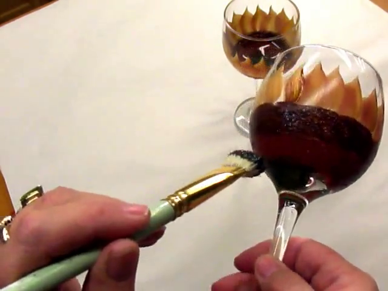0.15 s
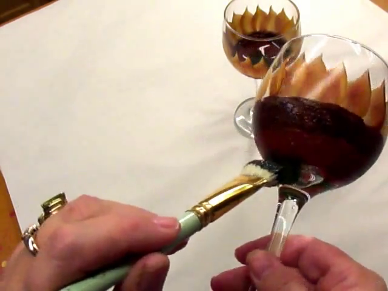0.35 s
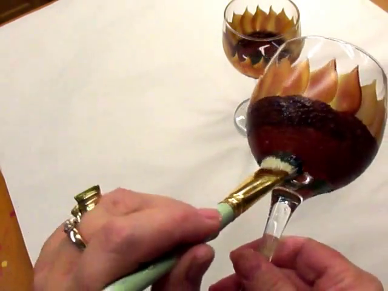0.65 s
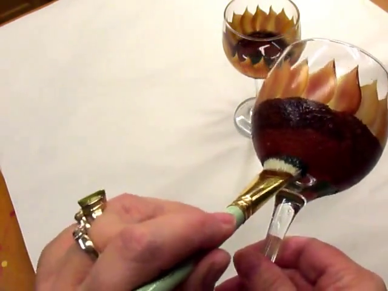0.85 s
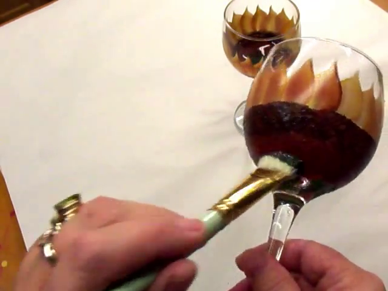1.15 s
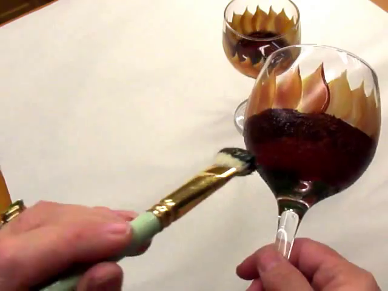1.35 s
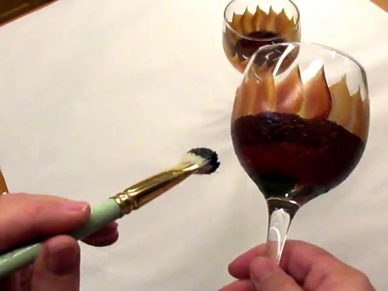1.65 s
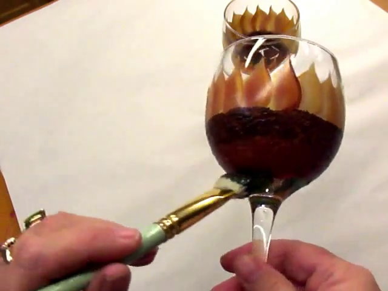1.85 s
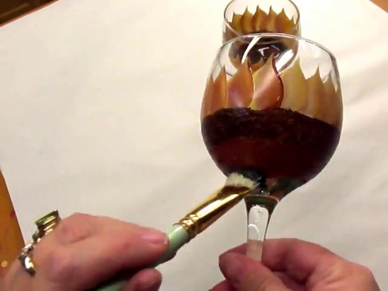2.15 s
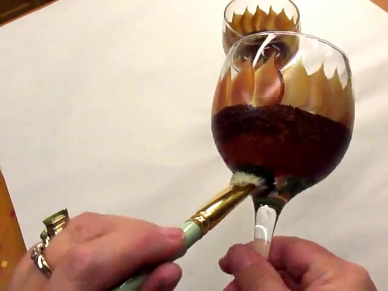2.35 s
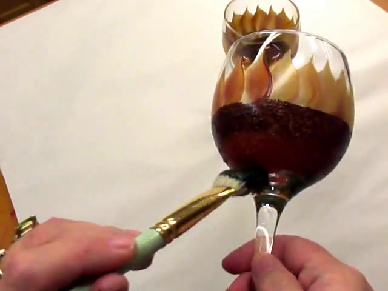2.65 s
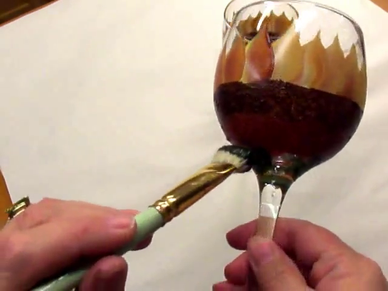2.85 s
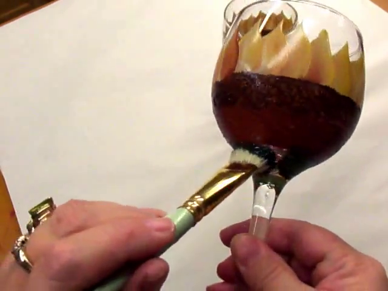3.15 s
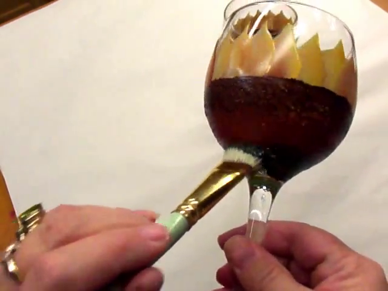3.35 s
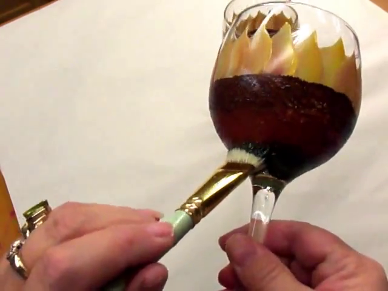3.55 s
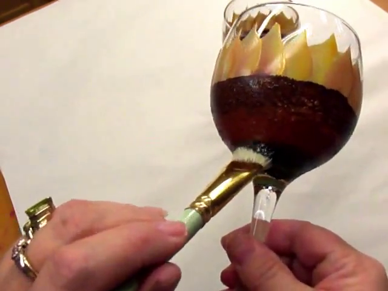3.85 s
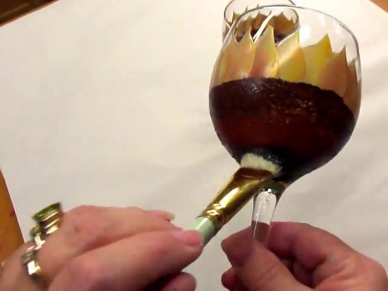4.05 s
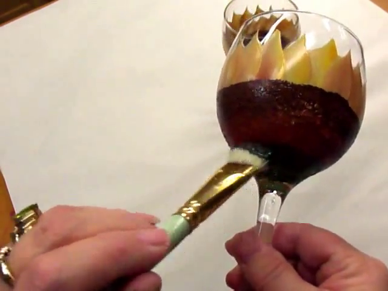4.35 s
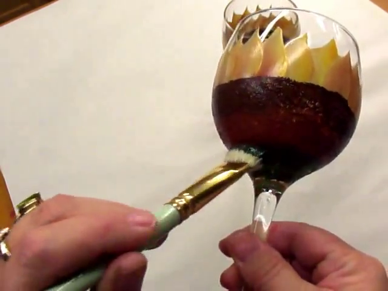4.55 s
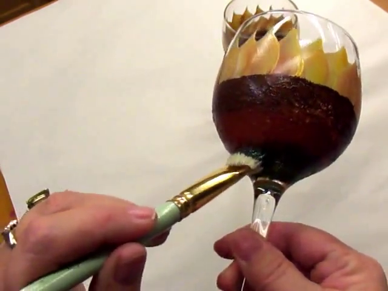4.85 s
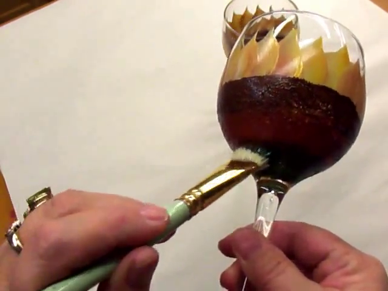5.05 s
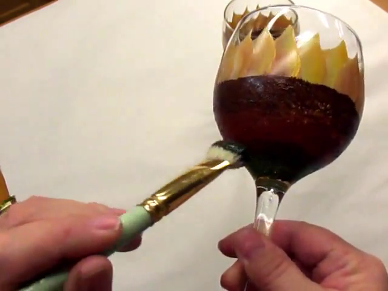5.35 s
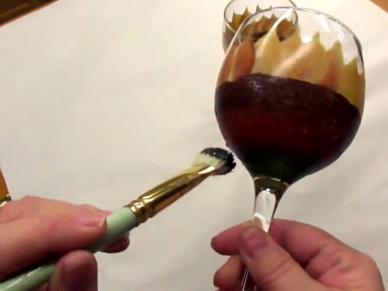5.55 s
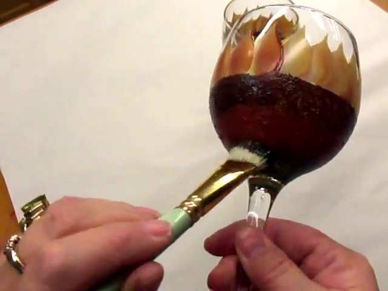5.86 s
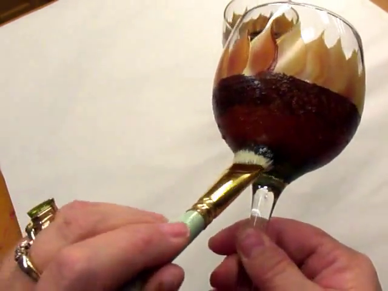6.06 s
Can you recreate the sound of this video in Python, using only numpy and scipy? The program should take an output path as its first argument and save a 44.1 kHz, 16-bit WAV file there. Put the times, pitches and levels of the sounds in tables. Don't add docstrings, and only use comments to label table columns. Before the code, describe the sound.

In a quiet humming room, tiny brush crackles are broken by a single loud table knock with a glassy ring, then grow busier and calm.

```python
import sys
import numpy as np
from scipy import signal
from scipy.fft import rfft, irfft
from scipy.io import wavfile
from scipy.ndimage import uniform_filter1d

SR = 44100
rng = np.random.default_rng(int(sys.argv[2]) if len(sys.argv) > 2 else 0)


def inscribe(sig):
    pcm = np.round(np.clip(np.atleast_2d(sig).T, -1, 1) * 32767)
    wavfile.write(sys.argv[1], SR, pcm.astype(np.int16))


def undo_db(level):
    steps = np.asarray(level, float) / 20
    return 10 ** steps


N = 273552
TIME_S = np.arange(N) / SR
KNOCK_S = 2.5174


def level(x, db):
    return x * undo_db(db) / np.sqrt(np.mean(x ** 2))


def band(x, low_hz, high_hz):
    sos = signal.butter(2, [low_hz, high_hz], "bandpass", fs=SR, output="sos")
    return signal.sosfilt(sos, x)


def walk(rate_hz):
    hold = int(SR / rate_hz)
    steps = np.repeat(rng.standard_normal(N // hold + 1), hold)
    smooth = uniform_filter1d(uniform_filter1d(steps, hold), hold)
    return 0.58 * smooth[:N]


def ring(t, pitch_hz, t60_s, rise_s):
    t = np.maximum(t, 0)
    build_up = 1 - np.exp(-t / rise_s)
    decay = np.exp(-np.log(1000) * t / t60_s)
    return build_up * decay * np.sin(2 * np.pi * pitch_hz * t)


def snaps(rows):
    low_cycles, high_cycles = 1.02, 1.3
    high_lag_s = 0.00009
    out = np.zeros(N + 256)
    for start_s, low_db, low_hz, high_db, high_hz in rows:
        i = int(start_s * SR) - 8
        t = (i + np.arange(256)) / SR - start_s + 0.00018
        low_t60_s = np.log(1000) * low_cycles / low_hz
        high_t60_s = np.log(1000) * high_cycles / high_hz
        low = ring(t, low_hz, low_t60_s, 0.25 / low_hz)
        high = ring(t - high_lag_s, high_hz, high_t60_s, 0.5 / high_hz)
        out[i:i + 256] += undo_db(low_db) * low_hz / 4000 * low
        out[i:i + 256] += undo_db(high_db) * high_hz / 4000 * high
    return undo_db(-0.4) * out[:N]


# start_s, low_db, low_hz, high_db
THREADS = [(0.7573, -25, 5270, -20), (0.782, -35, 4200, -35), (0.9258, -27.5, 2800, -40),
           (1.0601, -33, 3200, -32.5), (1.073, -34, 3200, -38), (1.1457, -26, 3000, -34),
           (1.1566, -24, 2800, -30), (1.1618, -26, 2380, -44), (1.1656, -31, 3400, -28),
           (2.3913, -46, 2000, -26.5), (3.1732, -33, 4000, -34), (3.264, -18.5, 5000, -28),
           (3.2784, -27.5, 3000, -32), (3.4464, -38, 3000, -33.5), (3.5356, -30, 2800, -30.5),
           (3.6142, -25, 3200, -32), (3.6235, -34, 3200, -39), (3.6884, -24, 2600, -27.5),
           (3.7042, -25.5, 3200, -30.5), (3.7116, -26.5, 5600, -32), (3.8827, -29.5, 2800, -41),
           (3.902, -31, 4600, -31), (3.9151, -34, 3400, -34), (4.0125, -31, 3800, -25.5),
           (4.0323, -24.5, 4500, -25), (4.305, -32, 5650, -24.5), (4.3631, -28, 5200, -29),
           (4.5494, -36, 3400, -36), (4.9708, -30, 5660, -31), (5.2582, -31, 2800, -33)]
# start_s, low_db, low_hz, high_db
BRISTLES = [(0.7592, -29, 2400, -41), (1.1474, -29, 3000, -34), (1.1533, -43, 3400, -33),
            (1.1601, -21.5, 3000, -34), (1.2718, -29, 3750, -44), (2.2376, -39, 4000, -30),
            (2.2389, -40, 3600, -33), (2.2397, -23.5, 3570, -22.5), (3.1594, -50, 3600, -35),
            (3.5295, -29, 4000, -34.5), (3.6317, -34, 3600, -38), (3.7982, -39, 5200, -28),
            (3.8075, -26.5, 3600, -28.5), (3.8182, -30, 3000, -34), (3.8582, -31, 4200, -43),
            (3.8657, -29.5, 2600, -42), (3.9454, -21.5, 2800, -25), (4.0411, -33, 4000, -42),
            (4.1832, -52, 3600, -31), (4.2127, -32.5, 3400, -22), (4.2882, -41, 3600, -36),
            (4.2923, -27, 4400, -23), (4.2967, -35, 3800, -30), (4.3035, -30, 4500, -26),
            (4.3308, -28, 4800, -34), (4.3424, -37, 3600, -33), (4.366, -40, 3600, -33),
            (4.6927, -26, 3000, -36), (4.6944, -33, 2800, -35), (6.1621, -31, 4600, -53)]


def dabs():
    thread_high_hz, bristle_high_hz = 5870, 8000
    threads = [(*row, thread_high_hz) for row in THREADS]
    bristles = [(*row, bristle_high_hz) for row in BRISTLES]
    rows = np.array(threads + bristles)
    start_s, low_db, low_hz, high_db, high_hz = rows.T
    out = snaps(rows)
    for kind in ("twin", "straggler", "straggler"):
        wait, size, low, high = rng.random((len(rows), 4)).T
        if kind == "twin":
            lag_ms = np.interp(wait, (0, 1), (0.25, 0.8))
            db = -9 - 5 * size
            low, high = 1, 1
        else:
            lag_ms = 1.5 - 6 * np.log(1 - wait)
            db = -17 + 4 * (2 * size - 1)
            low, high = 0.88 + 0.5 * low, 0.87 + 0.33 * high
        late_s = start_s + lag_ms / 1000
        out += snaps(np.transpose([late_s, low_db + db, low_hz * low, high_db + db, high_hz * high]))
    return out


# time_s, snaps_per_s
CRACKLE = [(0, 5), (.7, 8), (1.3, 8), (2.1, 5), (2.6, 8), (3.2, 15), (3.6, 25), (4.4, 25), (4.8, 15),
           (5.3, 10), (6.2, 8)]


def crackle():
    when, chance, size, low, high, tilt = rng.random((400, 6)).T
    start_s = 0.017 + when * (TIME_S[-1] - 0.02)
    snaps_per_s = np.interp(start_s, *np.transpose(CRACKLE))
    happens = chance < snaps_per_s * TIME_S[-1] / len(start_s)
    low_db = -48 + 10 * size
    high_db = low_db - 10.5 + 12 * tilt
    rows = np.transpose([start_s, low_db, 2500 + 2600 * low, high_db, 6000 + 3000 * high])
    return snaps(rows[happens])


# pitch_hz, level_db, t60_s
BOWL = [(2223, -35, 0.02), (2800, -35.5, 0.012), (3200, -43.5, 0.029), (4900, -35, 0.017),
        (8240, -41, 0.01)]


def bowl(x):
    t = np.arange(2048) / SR
    modes = sum(undo_db(db) * ring(t, hz, t60_s, 0.00013) for hz, db, t60_s in BOWL)
    late = np.roll(x, int(1.364 * SR / 1000))
    echo = undo_db(-21) * band(late, 1000, 7100)
    return x + echo + signal.fftconvolve(x, modes)[:N]


# start_s, level_db, push_ms
BLOWS = [
    (2.5174, -1.5, 0.13),
    (2.5189, -0.5, 0.27),
    (2.522, -19, 0.13),
    (2.5257, -16, 0.13),
]
# pitch_hz, level_db, t60_s
STRIKER = [(956, -23, 0.067), (1215, -16, 0.027), (1530, -10.5, 0.022), (1820, -23, 0.012),
           (2240, -17, 0.02), (3250, -15, 0.014), (3800, -19.5, 0.027), (6660, -17.5, 0.031)]
# pitch_hz, level_db, t60_s, rise_ms
RINGING = [(69, -51, 0.38, 20), (102, -44, 0.23, 13), (143.5, -34, 0.16, 4.9), (205, -22, 0.21, 6),
           (255, -32, .05, 4), (422, -28, 0.041, 4), (572, -30, 0.06, 1.9), (842, -32.5, 0.07, 2.8),
           (969, -20, 0.06, 1.5), (1218, -23, 0.082, 2), (1325, -32, 0.14, 8.8), (1434, -31, .14, 8),
           (1836, -27, 0.075, 1), (2150, -31, 0.15, 2), (2225, -26, 0.09, 1), (2440, -25, 0.056, 1),
         (2530, -43, .06, 1), (2895, -25, 0.12, 0.72), (3400, -33, 0.066, 1), (3680, -41, 0.15, 2),
         (4000, -43, 0.076, 1), (6960, -37.5, 0.16, 0.85)]


def knock():
    t = np.arange(SR) / SR
    striker = 0
    for k, (hz, db, t60_s) in enumerate(STRIKER):
        striker = striker + (-1) ** k * undo_db(db) * ring(t, hz, t60_s, 0.0001)
    force = np.zeros(N)
    for start_s, db, push_ms in BLOWS:
        push = np.exp(-0.5 * ((TIME_S - start_s) / (push_ms / 4000)) ** 2)
        force += undo_db(db) * push / (push_ms * SR / 1600)
    out = signal.fftconvolve(force, striker)[:N]
    start = int(KNOCK_S * SR)
    since_s = TIME_S[start:start + SR] - KNOCK_S
    for hz, db, t60_s, rise_ms in RINGING:
        out[start:start + SR] += undo_db(db) * ring(since_s, hz, t60_s, rise_ms / 1000)
    return out


# low_hz, high_hz, crack_db, crack_t60_s, tail_db, tail_t60_s
CLATTER = [(236, 830, -30.5, 0.073, -39.5, 0.16), (794, 1930, -27, 0.044, -36, 0.19),
           (2000, 4040, -30.5, 0.061, -36.5, 0.24), (4200, 6400, -38, 0.078, -41.5, 0.21),
           (6300, 9700, -34, 0.039, -41, 0.24), (8500, 13500, -39, 0.026, -52, 0.23)]


def clatter():
    t = np.maximum(TIME_S - KNOCK_S, 0)
    onset = np.minimum(t / 0.00043, 1)
    out = 0
    for low_hz, high_hz, crack_db, crack_t60_s, tail_db, tail_t60_s in CLATTER:
        crack = undo_db(crack_db - 60 * t / crack_t60_s)
        tail = undo_db(tail_db - 60 * t / tail_t60_s)
        grain = undo_db(4.4 * walk(250))
        noise = level(band(rng.standard_normal(N), low_hz, high_hz), 0)
        out = out + noise * grain * (crack + tail) * onset
    return out


# start_s, low_db, low_hz, high_db, high_hz
RATTLE = [
    (2.5665, -38, 4500, -33, 8800),
    (2.5818, -39, 5000, -40, 9000),
    (2.5885, -38, 3500, -40, 8500),
    (2.5915, -38, 5200, -32, 9000),
    (2.6003, -42, 4800, -39, 9200),
    (2.6025, -31, 4800, -40, 8000),
    (2.6113, -46, 4000, -42, 7500),
    (2.6387, -40, 4500, -52, 7000),
]


def rattle():
    return snaps(RATTLE)


# pitch_hz, level_db, t60_s, rise_ms
SING = [(1119, -48, 1.3, 250), (2319, -39, .88, 70)]


def sing():
    t = TIME_S - KNOCK_S
    return sum(undo_db(db) * ring(t, hz, t60_s, rise_ms / 1000) for hz, db, t60_s, rise_ms in SING)


# low_hz, high_hz, t60_s, level_db
ROOM = [(297, 710, 0.23, -12), (706, 1930, 0.17, -13.5), (2000, 4200, 0.18, -12), (5000, 21000, 0.097, -9)]


def room(x):
    first_echo_ms = 5.4
    t = np.arange(SR // 2) / SR - first_echo_ms / 1000
    patches = undo_db(3 * rng.standard_normal(len(t) // 16 + 1)).repeat(16)[:len(t)]
    grit = rng.standard_normal(len(t)) * patches * (t > 0)
    tail = 0
    for low_hz, high_hz, t60_s, db in ROOM:
        fading = grit * np.exp(-np.log(1000) * t / t60_s)
        tail = tail + undo_db(db - 23.5) * band(fading, low_hz, high_hz)
    return signal.fftconvolve(x, tail)[:N]


# pitch_hz, level_db
HUM = [(240, -85), (360.3, -73.5), (479.9, -72.5), (600, -67), (720, -100)]
# pitch_hz, width_hz, level_db
BUZZ = [(3760, 213, -79), (5420, 310, -86), (2900, 970, -82), (4570, 800, -84.5)]
# time_s, gain_db
BUZZ_GAIN = [(0, -16), (1.1, -17), (1.3, 9), (3, 12), (4.5, 11), (6.2, 13)]


def hum_and_buzz():
    hum = 0
    for hz, db in HUM:
        tone = np.sqrt(2) * np.sin(2 * np.pi * (hz * TIME_S + rng.random()))
        hum = hum + undo_db(db + 2 * walk(2.8)) * tone
    cycles = np.floor(TIME_S * 59.94 - 0.16)
    pulses = np.diff(cycles, prepend=-1)
    pulses = pulses * undo_db(2.2 * rng.standard_normal(N)) * rng.choice([-1, 1], N)
    buzz = sum(level(band(pulses, hz - width / 2, hz + width / 2), db) for hz, width, db in BUZZ)
    return hum + buzz * undo_db(np.interp(TIME_S, *np.transpose(BUZZ_GAIN)))


# pitch_hz, level_db (per Hz)
AIR = [(15, -56), (25, -28), (220, -5), (291, -6.5), (340, -4.5), (538, -5.5), (596, -7), (661, -5),
       (9450, -20.5), (10500, -21.5), (11300, -23.5), (14700, -59), (22000, -120)]


def air():
    hz = np.maximum(np.arange(N // 2 + 1) * SR / N, 1)
    air_hz, air_db = np.transpose(AIR)
    shape = undo_db(np.interp(np.log(hz), np.log(air_hz), air_db))
    noise = irfft(rfft(rng.standard_normal(N)) * shape, N)
    return level(noise * undo_db(0.6 * walk(0.55)), -54)


def scene():
    brush = bowl(band(dabs() + crackle(), 450, 18000))
    table = knock() + rattle()
    echoes = room(undo_db(-0.5) * brush + table)
    events = band(brush + table + echoes + clatter() + sing(), 70, 18000)
    return (events + hum_and_buzz() + air())[None]


def low_pass(x):
    return signal.sosfilt(signal.butter(12, 12390, fs=SR, output="sos"), x)


def record(dry):
    top_cut = signal.ellip(8, 0.2, 32, 10980, fs=SR, output="sos")
    mix = signal.sosfilt(top_cut, dry)
    return low_pass(mix)


dry = scene()
out = record(dry)
inscribe(out)
```